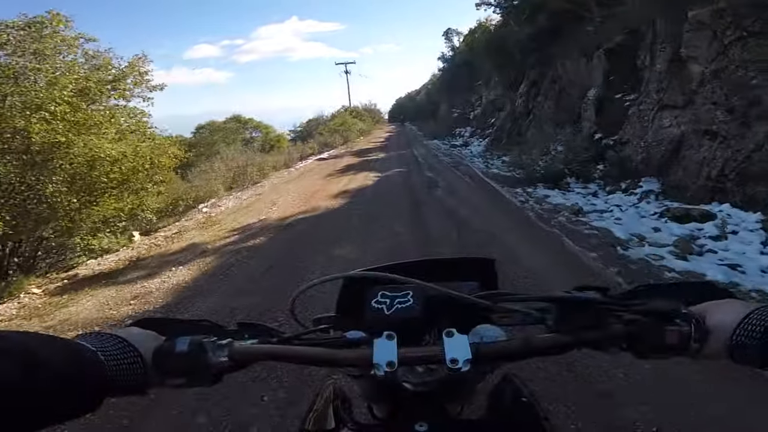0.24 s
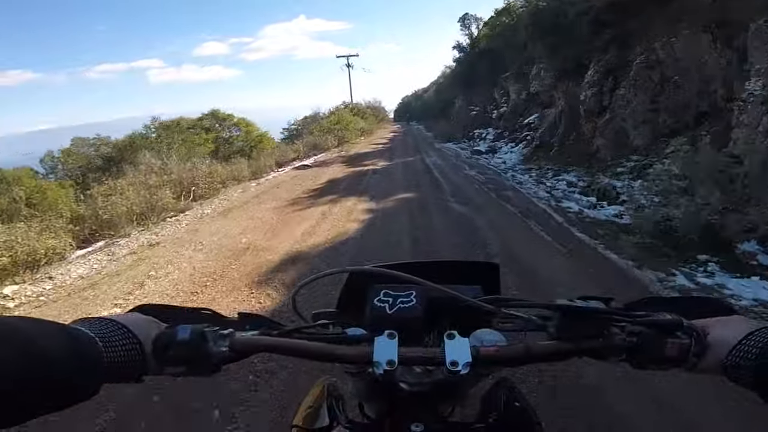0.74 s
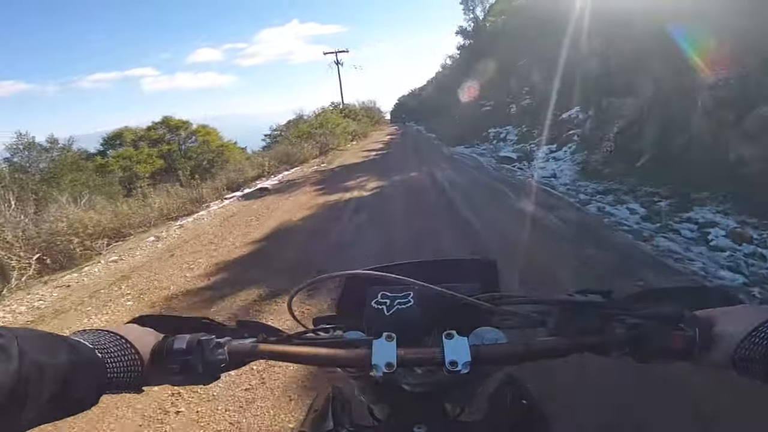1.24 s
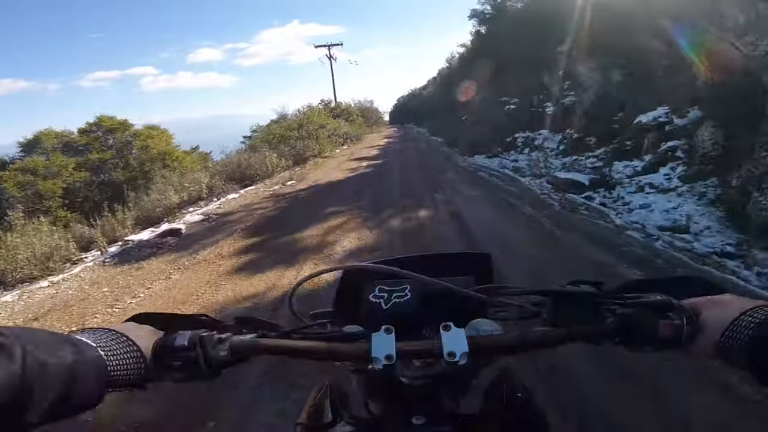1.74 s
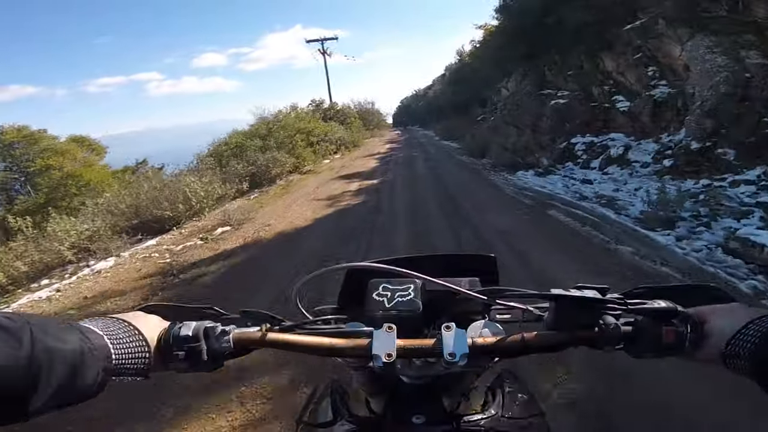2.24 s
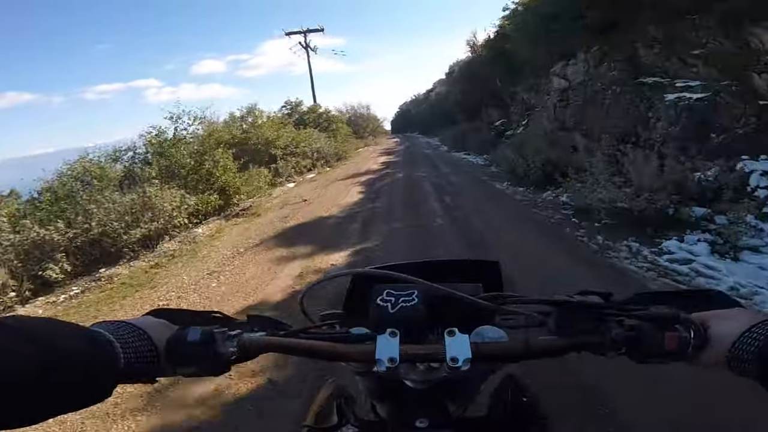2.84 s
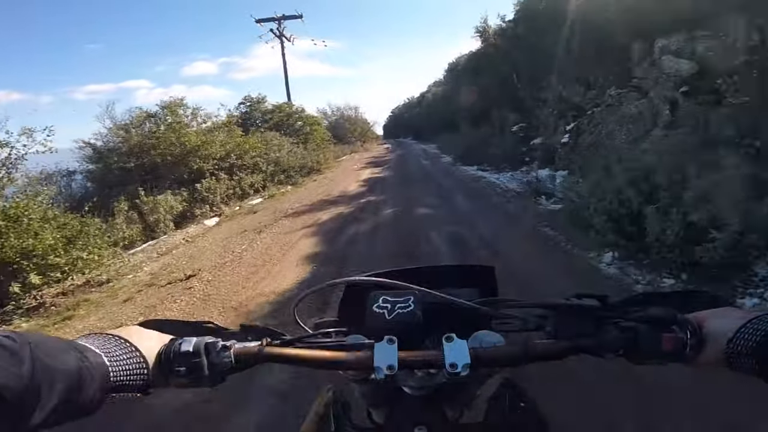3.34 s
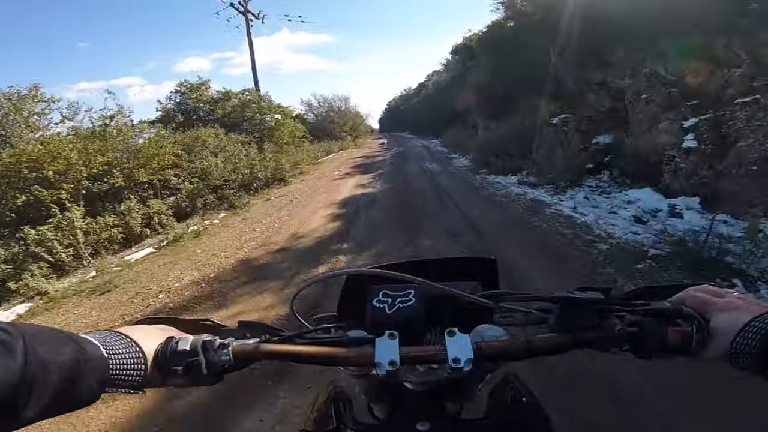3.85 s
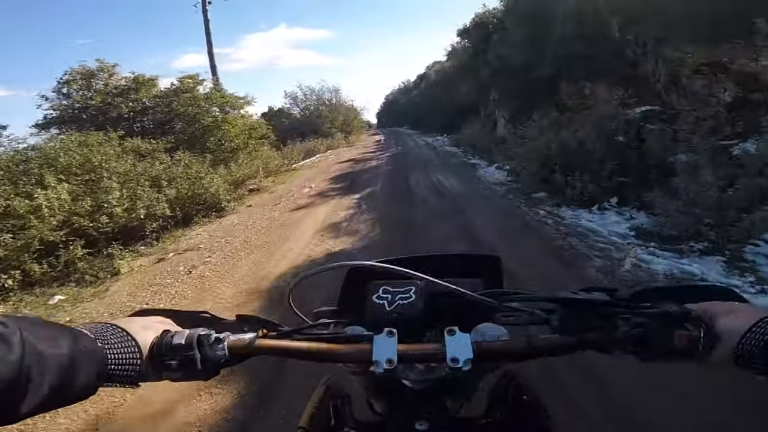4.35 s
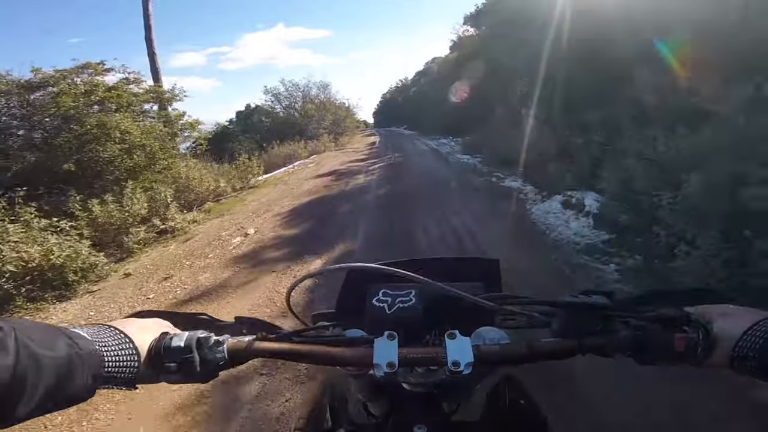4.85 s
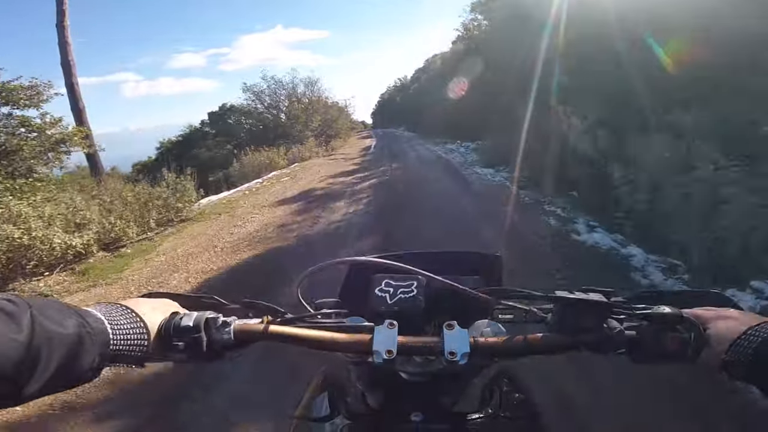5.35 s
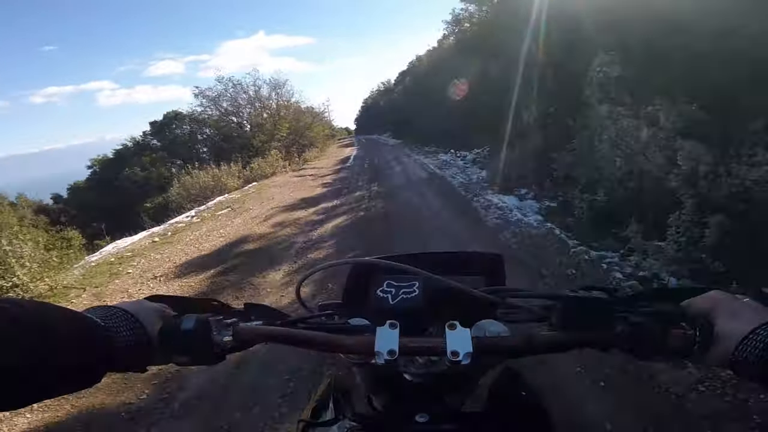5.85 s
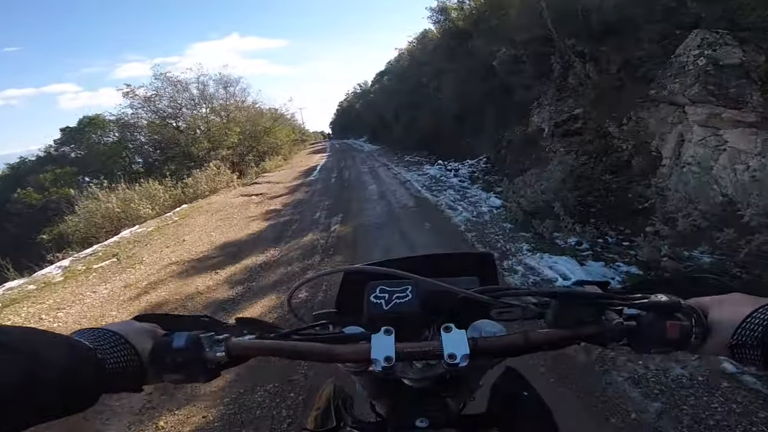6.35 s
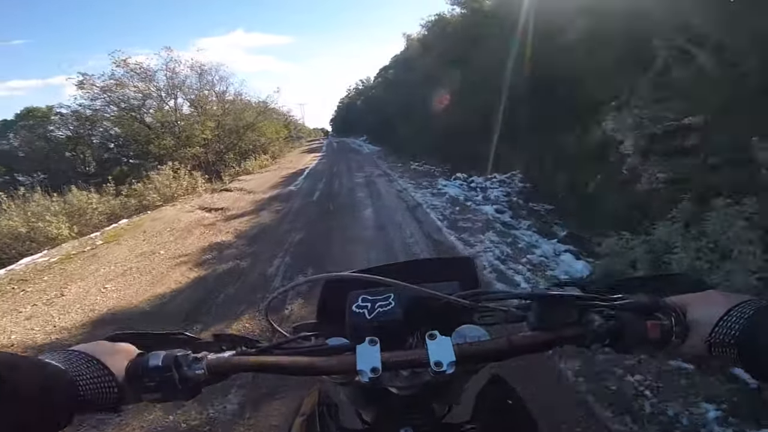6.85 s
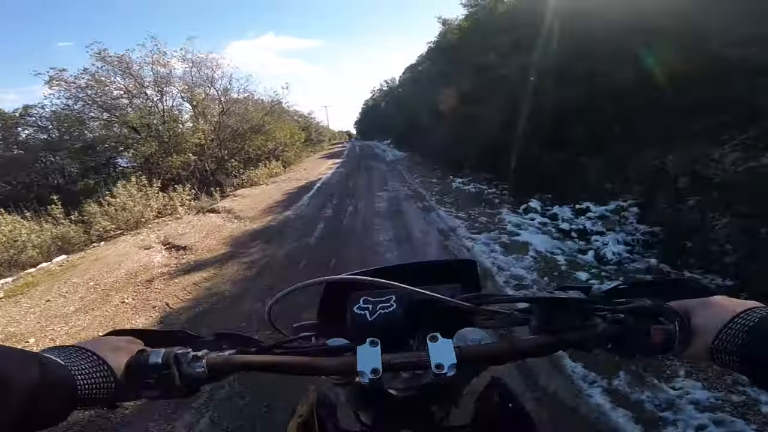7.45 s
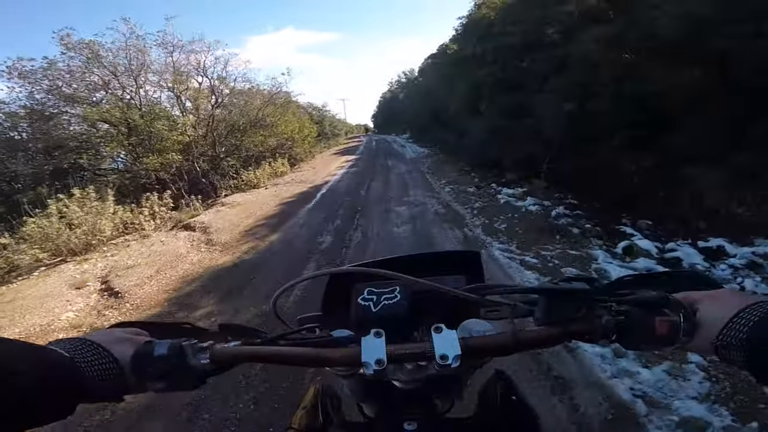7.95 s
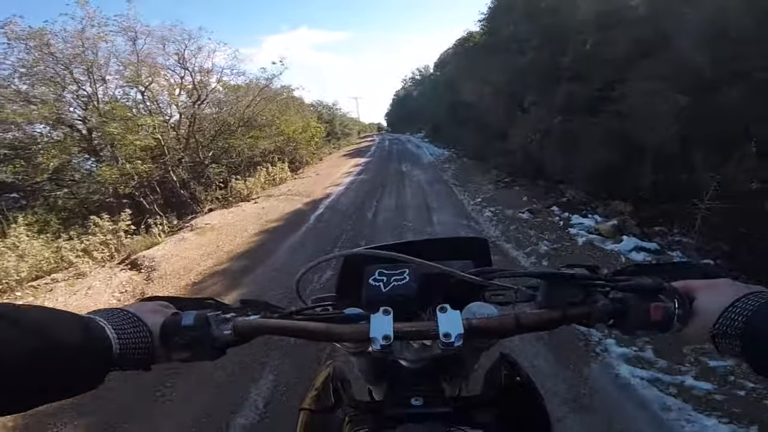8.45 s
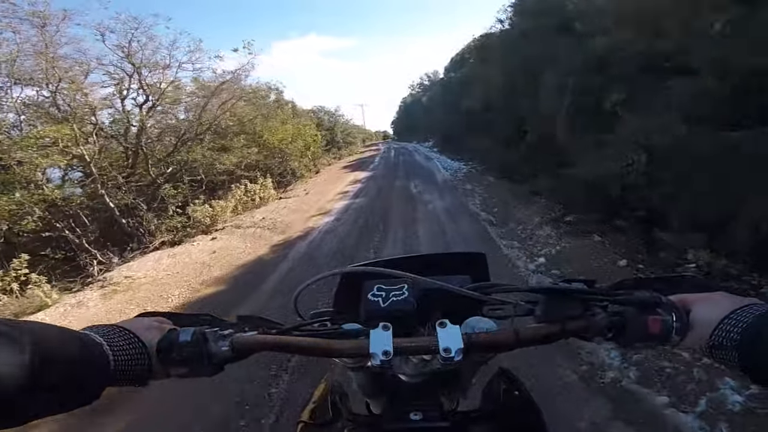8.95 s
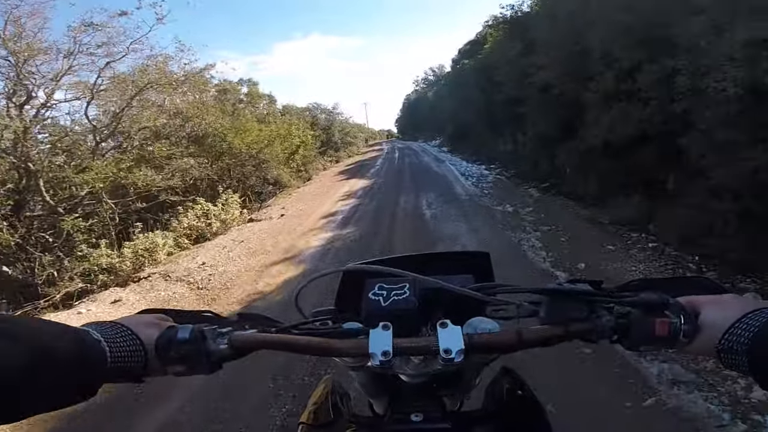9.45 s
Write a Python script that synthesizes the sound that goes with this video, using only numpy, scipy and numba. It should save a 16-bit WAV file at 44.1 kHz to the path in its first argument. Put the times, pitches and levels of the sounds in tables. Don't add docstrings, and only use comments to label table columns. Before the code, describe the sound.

Outdoors on gravel, a four-stroke single-cylinder dirt bike is heard very close from the rider's chest, dense, bassy and slightly compressed. It starts at about twenty thumps a second, with scattered pops and light rattles; from 1.4 to 3.3 s the burns become full and regular, a firm throaty pull. Then the throttle eases: revs sag, pops turn sporadic, and loose parts and stones knock around 3.1 to 4.6 s. From 4.5 to 7.8 s it lugs at eleven to fifteen beats a second, lumpy and stumbling, with a brief flurry of pops and stone hits near 6.2 s and the intake fading around 6.8. A second bike's mid-pitched drone is clearest near 5 to 6.5 s. From 8 s burns strengthen and pitch climbs to the end, with thin high squeaks after 9.2 s. Valve clatter, gear whine, tyre rumble and low wind continue throughout.

```python
import sys
import numpy as np
from scipy import signal
from scipy.fft import rfft, irfft, next_fast_len
from scipy.io import wavfile
from scipy.ndimage import uniform_filter1d
from numba import njit

SR = 44100
rng = np.random.default_rng(int(sys.argv[2]) if len(sys.argv) > 2 else 0)


def volts_from_decibels(level):
    exponent = np.asarray(level, float) / 20
    return 10 ** exponent


def master(y):
    cut = np.clip(np.atleast_2d(y).T, -1, 1)
    pcm = np.round(cut * 32767)
    wavfile.write(sys.argv[1], SR, pcm.astype(np.int16))


N = 428211

# (time [s], pop level [dB])
STRONG_BURNS = [(0.048, -7.5), (0.253, -9), (0.46, -13), (0.666, -10), (0.931, -12), (1.037, -9.5),
                (1.247, -4), (1.564, -7.5), (1.67, -7), (3.378, -8.5), (3.431, -9.5), (3.752, -8.5),
                (3.917, -9), (4.149, -6.5), (4.211, -9), (4.725, -5), (4.937, -15.5), (5.385, -16),
                (5.615, -11.5), (5.769, -14), (6.208, -13.5), (6.29, -8.5), (6.361, -10.5), (6.431, -8.5),
                (6.563, -13.5), (6.713, -11), (7.374, -12.5), (7.447, -10.5), (7.585, -12.5),
                (7.717, -14.5)]
VALVE_LEAD = .008


def level(x, db):
    return x * volts_from_decibels(db) / np.sqrt(np.mean(x ** 2))


def curve(s, v):
    return np.interp(np.arange(N) / SR, s, v)


@njit
def svf(x, hz, width):
    y, low_state, band_state = np.empty(len(x)), 0., 0.
    for i in range(len(x)):
        g = np.tan(np.pi * hz[i] / SR)
        k = width / hz[i]
        v = (band_state + g * (x[i] - low_state)) / (1 + g * (g + k))
        band_state, low_state = 2 * v - band_state, low_state + 2 * g * v
        y[i] = k * v
    return y


def band(x, hz, width):
    return svf(x, hz + np.zeros(N), float(width))


def noise(spectrum):
    hz, db = np.transpose(spectrum)
    size = next_fast_len(N)
    log_hz = np.log(np.arange(size // 2 + 1) * SR / size + 1)
    colour = volts_from_decibels(np.interp(log_hz, np.log(hz), db))
    return level(irfft(rfft(rng.standard_normal(size)) * colour, size)[:N], 0)


def walk(rate):
    k = int(SR / rate)
    steps = np.repeat(rng.standard_normal(N // k + 1), k)
    return 0.67 * uniform_filter1d(uniform_filter1d(steps, k), k)[:N]


def kicks(s, size):
    x, at = np.zeros(N), np.round(np.asarray(s) * SR).astype(int)
    inside = (at >= 0) & (at < N)
    np.add.at(x, at[inside], (size + 0 * at)[inside])
    return x


def fade(x, tau_s):
    return signal.lfilter([1], [1, -np.exp(-1 / (tau_s * SR))], x)


def ring(hit_s, size, modes, scatter_db, push_s):
    chance = rng.standard_normal((len(hit_s), len(modes)))
    window = np.hanning(int(push_s * SR))
    out = 0
    for k, (hz, db, t60, polarity) in enumerate(modes):
        push = kicks(hit_s, polarity * size * volts_from_decibels(db + scatter_db * chance[:, k]))
        push = signal.lfilter(window / window.sum(), [1], push)
        pole = np.exp(2j * np.pi * hz / SR - np.log(1000) / (t60 * SR))
        out = out + signal.lfilter([1], [1, -pole], push).imag
    return out


def burns(fire_s):
    # (time [s], pop level [dB], scatter [dB])
    throttle = [(0, -25, 3), (1.38, -25, 3), (1.39, -10.5, 1), (1.74, -10.5, 1), (1.76, -5.5, .6),
                (3.05, -6, .6), (3.29, -11, 1), (3.3, -22, 3), (4.4, -19, 3), (6.7, -19, 2), (7.8, -18, 2),
                (7.92, -10, 1), (8.1, -9, 1), (8.25, -6, 1), (8.42, -9, 1), (8.8, -6.5, .6),
                (9.71, -5.5, .5)]
    s, usual_db, scatter_db = np.transpose(throttle)
    db = np.interp(fire_s, s, usual_db)
    db = db + np.interp(fire_s, s, scatter_db) * rng.standard_normal(len(fire_s))
    for when, strong_db in STRONG_BURNS:
        db[np.argmin(abs(fire_s - when))] = strong_db
    return volts_from_decibels(db + 6.0)


def exhaust(fire_s, lugging, load_db):
    # (frequency [Hz], level [dB], t60 [s], polarity [-1 to 1])
    boom_modes = [(57.14, -6.5, 0.28, -0.66), (220.3, -10, 0.076, 0.46), (120, -4.5, 0.025, 0.79),
                  (290, -15, 0.023, 1), (64.45, -12.5, 0.27, -0.79), (70.9, -28.5, 0.39, 0.79)]
    # (frequency [Hz], level [dB], t60 [s], polarity [-1 to 1])
    pop_modes = [(198, 7, 0.035, 0.39), (264.8, 2.5, 0.036, -0.94), (108.9, 6, 0.17, 0.12),
                 (57.04, -3, 0.26, -0.36)]
    # (frequency [Hz], level [dB], t60 [s], polarity [-1 to 1])
    spit_modes = [(161, -7.5, 0.041, 0.82), (310, -9.5, 0.023, 0.58)]
    boom_db = 1.92 + 0.29 * load_db + 0.6 * lugging
    burn = burns(fire_s)
    unburnt = np.clip(1 - burn, 0, 1)
    jitter_s = (.00025 + .002 * lugging) * rng.standard_normal(len(fire_s))

    crack_s = fire_s - .0050 + 0.0033 * lugging * unburnt
    crack = ring(crack_s, burn, pop_modes, 0.96 + 0.72 * lugging, 0.0024)
    thump_size = volts_from_decibels(boom_db) * (1 + 0.16 * burn)
    thump = ring(fire_s + 0.003 + jitter_s, thump_size, boom_modes, 1.5 + 1.8 * lugging, 0.0025)
    spit = ring(fire_s - .001 + jitter_s, volts_from_decibels(-4) * lugging * unburnt, spit_modes, 4.0, .002)
    again_s = fire_s + (0.019 + 0.0017 * rng.standard_normal(len(fire_s)))
    again = ring(again_s, volts_from_decibels(boom_db - 4.5) * lugging, boom_modes[:1], 1.0, 0.0039)
    return crack + thump + spit + again


def casing(pipe, rate, cycles):
    # (frequency [Hz], density [dB per Hz])
    rumble_colour = [(250, -5), (420, -6), (464, -3.5), (560, -3), (987, -13.5), (1120, -18.5), (1240, -14),
                     (1510, -18.5), (1660, -26), (1900, -23.5), (2820, -24), (3600, -31.5), (4680, -68),
                     (7920, -120)]
    # (teeth met [per cycle], level [dB], width [Hz])
    gears = [(62.1, 1, 34)]
    # (frequency [Hz], width [Hz], level [dB])
    case_modes = [(1233, 37, -18), (1388, 67, -18), (1608, 110, -18)]
    crest = uniform_filter1d(pipe, int(0.0026 * SR))
    throb_db = 1.2 * crest / crest.std() + 1.5 * walk(40)
    rumble = volts_from_decibels(throb_db) * noise(rumble_colour)
    whine = sum(level(band(rng.standard_normal(N), mesh * rate, w), db) for mesh, db, w in gears)
    shake_db = (rate - 19) * 0.67 + 2.0 * walk(1.1) + 1.8 * np.cos(2 * np.pi * (cycles - .15))
    shake = volts_from_decibels(shake_db) * rng.standard_normal(N)
    rings = sum(level(band(shake, hz, w), db) for hz, w, db in case_modes)
    return level(rumble + rings + volts_from_decibels(-14.5 + 2.0 * walk(3.14)) * whine, 0)


def clatter(cycles):
    # (place in cycle [0-1], level [dB], decay [share of cycle], ringing [dB])
    knocks = [
        (.04, -9, .2, -14),
        (.21, 0, .13, -12),
        (.5, -4, .08, 0),
        (.58, -9, .28, -10),
    ]
    # (frequency [Hz], density [dB per Hz])
    hiss_colour = [(1530, -5), (2600, 0), (2850, -1), (3010, -7.5), (3390, -3.5), (3720, -12), (4150, -7.5),
                   (4620, -3.5), (5250, 0), (6610, -5.5), (7240, -9), (8030, -12.5), (8690, -8.5),
                   (10300, -11.5), (11100, -17), (14400, -53.5), (22000, -120)]
    # (frequency [Hz], width [Hz], level [dB])
    cover_modes = [(2550, 46, -26.5), (2814, 23, -14), (3970, 43, -16.5), (4230, 95, -16),
                   (6640, 84, -17.5), (7910, 350, -13)]
    whole = np.floor(cycles).astype(int)
    hiss_gate, ring_gate = volts_from_decibels(-11), volts_from_decibels(-17)
    chance = rng.standard_normal((whole.max() + 2, len(knocks), 2))
    for k, (place, db, decay, ring_db) in enumerate(knocks):
        since = (cycles - place - 0.012 * chance[whole, k, 0]) % 1
        knock = volts_from_decibels(db + 1.2 * chance[whole, k, 1]) * np.exp(-since / decay)
        hiss_gate = hiss_gate + knock
        ring_gate = ring_gate + volts_from_decibels(ring_db) * knock
    hiss_gate = uniform_filter1d(hiss_gate, int(.006 * SR))
    hiss = hiss_gate * volts_from_decibels(2.5 * walk(250)) * noise(hiss_colour)
    shake = ring_gate * rng.standard_normal(N)
    rings = sum(level(band(band(shake, hz, w), hz, 8 * w), db) for hz, w, db in cover_modes)
    return level(level(hiss, 0) + rings, 0)


def tappet(fire_s):
    # (frequency [Hz], level [dB], t60 [s], polarity [-1 to 1])
    seat_modes = [(4030, -2, .035, 1), (4280, 2, .04, 1), (4480, -4, .03, 1)]
    # (frequency [Hz], level [dB], t60 [s], polarity [-1 to 1])
    rocker_modes = [(1230, -2, .05, 1), (1400, 1, .04, 1), (1640, -2, .03, 1)]
    cycle_s = np.gradient(fire_s)
    chance = .012 * rng.standard_normal((len(fire_s), 2)).T
    lead = VALVE_LEAD * (1 / cycle_s - 13)
    tick = ring(fire_s + cycle_s * (.54 - 1.4 * lead + chance[0]), 1, seat_modes, 1.8, .0004)
    knock = ring(fire_s + cycle_s * (.16 + 2 * chance[1]), 1, rocker_modes, 2.5, .0004)
    return level(tick, -13) + level(knock, -5)


def air_box(cycles, fire_s):
    suck = volts_from_decibels(5.0 * np.cos(2 * np.pi * (cycles - .2))) * rng.standard_normal(N)
    hum = band(band(suck, 465, 65), 465, 120)
    gulp = ring(fire_s + .2 * np.gradient(fire_s), 1, [(465, 0, .06, 1)], 1.5, .001)
    return level(level(hum, 0) + level(gulp, -4), 0)


def jolts():
    # (time [s], level [dB])
    bumps = [
        (0.0513, -33),
        (0.159, -27),
        (0.3494, -42),
        (3.1794, -35),
        (3.4386, -28),
        (3.7534, -30),
        (4.0645, -30),
        (4.6194, -33),
        (6.128, -32),
        (6.2277, -42),
    ]
    # (time [s], level [dB])
    stones = [
        (1.063, -41),
        (3.063, -34),
        (3.645, -25),
        (4.185, -38),
        (5.873, -36),
        (6.133, -30),
        (6.219, -27),
    ]
    bright = [(800, -10), (3000, 0), (10000, -2), (11800, -14), (13500, -12), (15000, -28)]
    dull = [(300, -15), (700, 0), (2500, -6), (6000, -25), (11000, -60)]
    s, db = np.transpose(bumps)
    rattle = fade(kicks(s, volts_from_decibels(db - 10)), .02) * noise(bright)
    s, db = np.transpose(stones)
    return rattle + fade(kicks(s, volts_from_decibels(db - 4)), .008) * noise(dull)


def squeaks():
    # (time [s], length [s], frequency [Hz], level [dB])
    squeals = [
        (9.254, .034, 9945, -41),
        (9.288, .03, 10335, -41),
        (9.35, .03, 10335, -55),
        (9.57, 0.044, 10335, -51),
    ]
    t, out = np.arange(N) / SR, 0
    for s, length, hz, db in squeals:
        gate = uniform_filter1d(volts_from_decibels(db) * ((t > s) & (t < s + length)), int(.003 * SR))
        out = out + gate * np.sin(2 * np.pi * hz * t)
    return out


def bike_ahead():
    # (time [s], engine speed [cycles/s], level [dB])
    drone = [(0, 27.5, -42), (1.5, 29.7, -40), (2.0, 29, -39), (3.2, 30, -41), (4.0, 28.5, -50),
             (5.0, 28.7, -39), (5.4, 29.7, -36), (5.9, 31.6, -34), (6.45, 33.2, -33), (6.7, 32.5, -43),
             (7.3, 32, -48), (9.71, 30, -55)]
    # (frequency [Hz], level [dB], t60 [s], polarity [-1 to 1])
    far_modes = [(450, 0, .03, 1), (520, -1, .03, 1), (790, -14, .02, 1)]
    s, hz, db = np.transpose(drone)
    beats = np.cumsum(2 * curve(s, hz)) / SR
    k = np.arange(np.ceil(beats[-1]))
    beat_s = np.interp(k, beats, np.arange(N) / SR) + .00012 * rng.standard_normal(len(k))
    size = volts_from_decibels(-6.5 * (k % 2))
    return volts_from_decibels(curve(s, db)) * level(ring(beat_s, size, far_modes, 2.0, .001), -.7)


def wind(rate):
    # (frequency [Hz], density [dB per Hz])
    wind_colour = [(20, -26), (42, -10), (62, 0), (90, -3), (180, -6), (300, -9), (400, -20), (600, -45),
                   (2000, -90)]
    return volts_from_decibels(-30 + 3 * np.clip((19 - rate) / 6, 0, 1) + 2.5 * walk(9)) * noise(wind_colour)


def scene():
    # (time [s], speed [cycles/s])
    speed = [(0.0, 19.763), (1.15, 18.758), (2.65, 19.692), (3.65, 18.546), (4.43, 16.228), (4.47, 14.826),
             (5.19, 13.247), (5.5, 13.323), (6.21, 10.769), (6.37, 15.003), (7.04, 11.448), (7.41, 12.656),
             (7.45, 14.701), (8.05, 14.767), (8.09, 16.354), (8.64, 16.576), (9.13, 18.693), (9.78, 20.93)]
    # (time [s], load [dB], intake [dB])
    effort = [(0, 4.5, 9), (.5, -0.5, -1), (1.3, -0.5, 2.5), (1.83, 1, 6.5), (2.6, 2.5, 5.5),
              (3.3, 1.5, 1.5), (3.64, 3, 6.5), (3.92, -1, -1), (4.87, -1.5, 1), (5.6, -3, 0),
              (6.43, -1.3, 1.5), (6.79, -6.5, -29), (7.21, -4.5, -5), (7.9, -3, -7), (8.24, 0, -0.5),
              (8.6, .6, -10), (9.38, 3, 7), (9.71, 2.5, 4)]
    rate = curve(*np.transpose(speed))
    cycles = np.cumsum(rate) / SR
    rate = uniform_filter1d(rate, int(.2 * SR))
    fire_s = np.interp(np.arange(np.ceil(cycles[-1])), cycles, np.arange(N) / SR)
    for when, _ in STRONG_BURNS:
        fire_s[np.argmin(abs(fire_s - when))] = when
    fire_rate = rate[np.minimum(fire_s * SR, N - 1).astype(int)]
    lugging = np.clip((19 - fire_rate) / 6, 0, 1)

    s, load_db, intake_db = np.transpose(effort)
    pipe = exhaust(fire_s, lugging, np.interp(fire_s, s, load_db))
    load_db, intake_db = curve(s, load_db), curve(s, intake_db)
    valve_cycles = np.maximum(cycles + VALVE_LEAD * (rate - 13), 0)
    engine = volts_from_decibels(-33 + 0.38 * load_db + 0.12 * intake_db) * casing(pipe, rate, cycles)
    engine = engine + volts_from_decibels(-44.5 + load_db) * clatter(valve_cycles)
    engine = engine + volts_from_decibels(-44 + .15 * load_db) * tappet(fire_s)
    engine = engine + volts_from_decibels(-39 + intake_db) * air_box(cycles, fire_s)
    return (pipe + engine + jolts() + squeaks() + bike_ahead() + wind(rate))[None]


def low_pass(x):
    return signal.sosfilt(signal.butter(12, 15330, fs=SR, output="sos"), x)


def record(dry):
    x = signal.sosfilt(signal.butter(2, 24, "highpass", fs=SR, output="sos"), dry)
    power = uniform_filter1d(x ** 2, int(0.072 * SR))
    x = x * (1 + power / volts_from_decibels(-22)) ** -.3 * volts_from_decibels(3)
    x = np.tanh(.8 * x) / .8
    x = signal.sosfilt(signal.butter(8, 11400, fs=SR, output="sos"), x)
    mirror = 2 * x * np.cos(2 * np.pi * 24000 * np.arange(N) / SR)
    mirror = signal.sosfilt(signal.butter(4, (12400, 14000), "bandpass", fs=SR, output="sos"), mirror)
    return low_pass(x + volts_from_decibels(-20) * mirror)


dry = scene()
out = record(dry)
master(out)
```